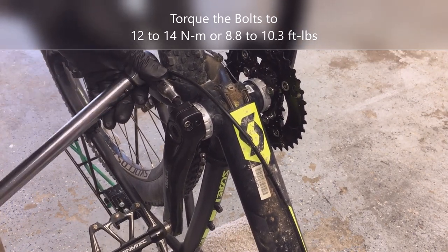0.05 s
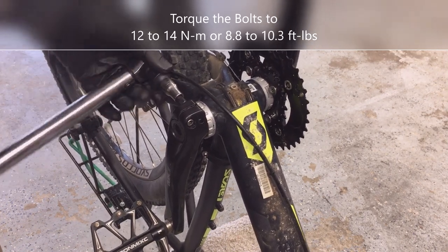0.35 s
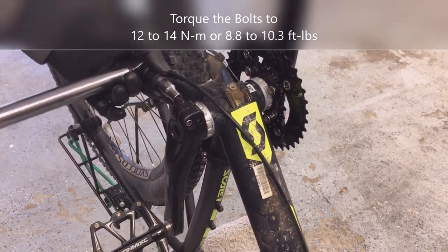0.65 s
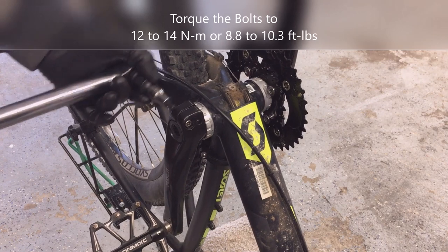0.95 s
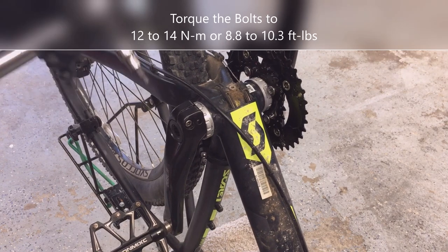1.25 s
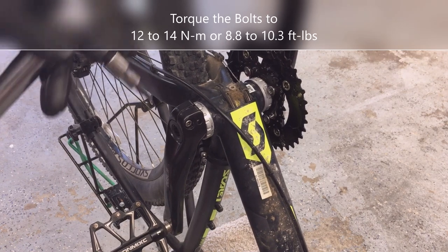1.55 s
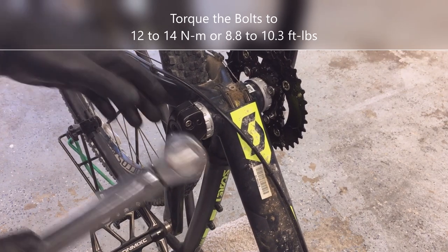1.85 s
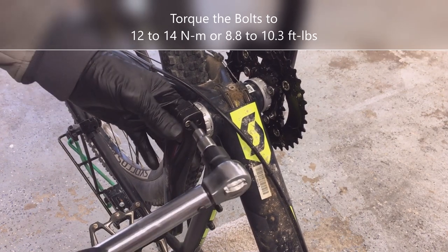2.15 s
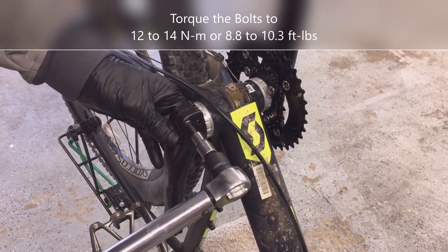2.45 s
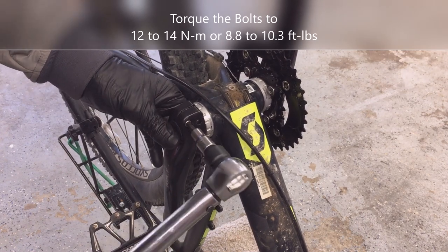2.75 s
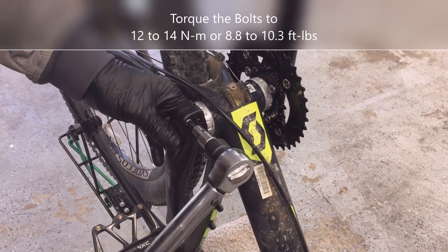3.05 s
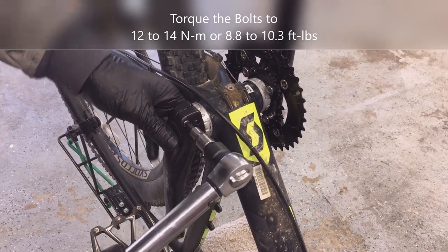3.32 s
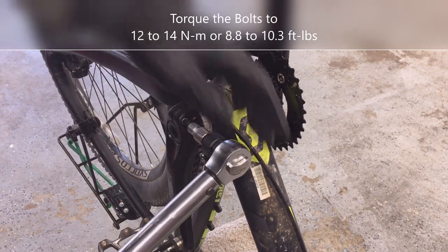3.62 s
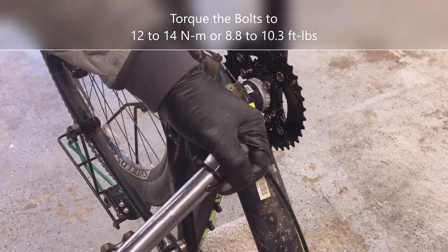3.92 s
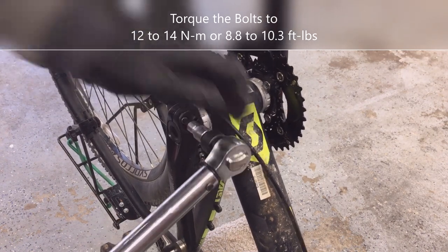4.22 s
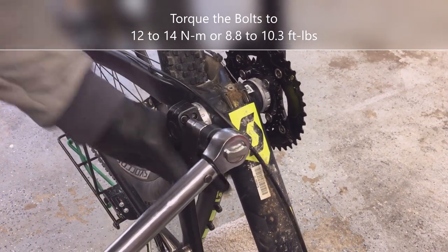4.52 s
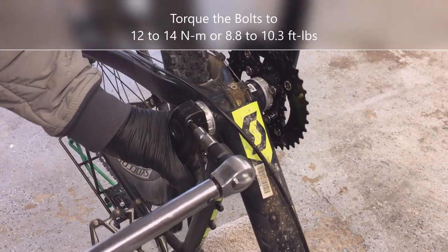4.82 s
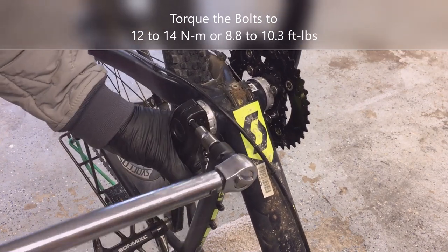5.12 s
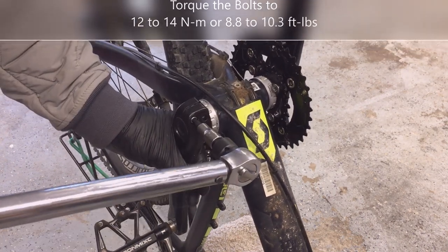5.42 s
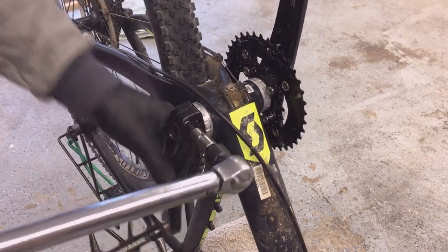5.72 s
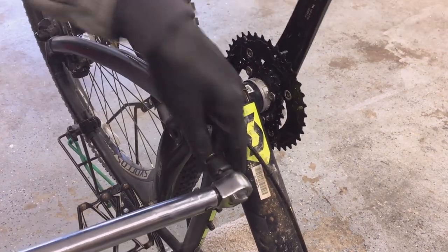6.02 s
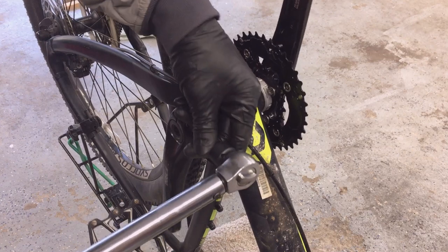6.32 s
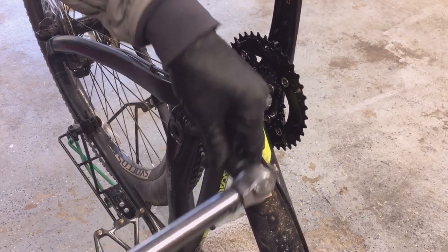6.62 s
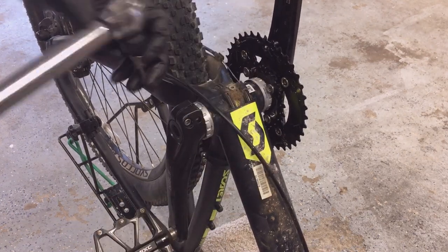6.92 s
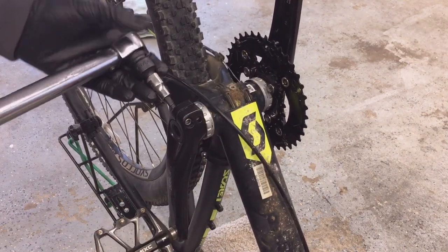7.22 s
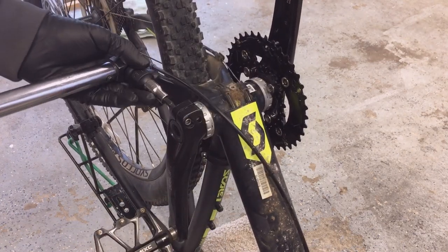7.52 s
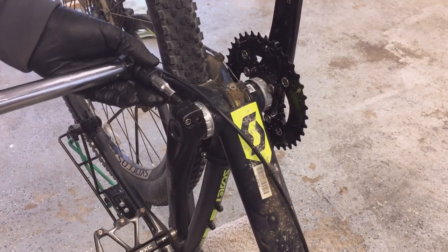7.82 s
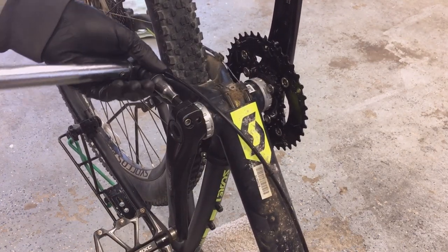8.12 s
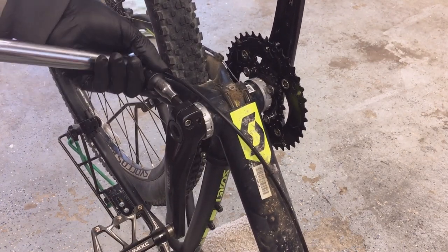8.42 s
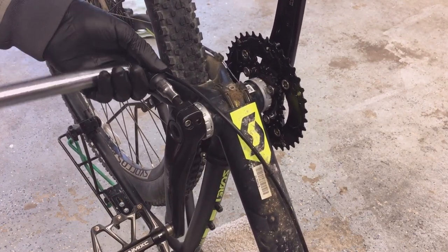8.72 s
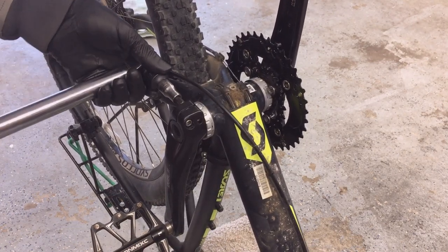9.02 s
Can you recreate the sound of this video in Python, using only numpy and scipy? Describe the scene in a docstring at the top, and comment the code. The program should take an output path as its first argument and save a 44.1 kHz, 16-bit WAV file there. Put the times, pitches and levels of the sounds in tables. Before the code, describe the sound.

In a small workshop with a faint low machine hum, a jacket sleeve swishes as a torque wrench clinks onto the bolts of a bicycle crank. The socket rings briefly, the frame knocks, the ratchet ticks and a rubber glove scuffs softly. Past halfway the wrench releases with a loud, ringing click and snaps back a quarter second later. More close steel taps follow.

```python
"""A low machine hum and the swish of a jacket sleeve, then a torque wrench clinks onto a bicycle crank.
The bit taps into the pinch bolts: steel chatters on steel, the socket rings and the frame knocks.
A rubber glove scuffs the wrench head and the ratchet ticks. Past halfway the wrench breaks over
with a loud, ringing click and snaps back a quarter second later. The small workshop adds a short tail."""
import sys
import numpy as np
from scipy import signal
from scipy.fft import rfft, irfft
from scipy.io import wavfile
from scipy.ndimage import uniform_filter1d

SR = 44100
rng = np.random.default_rng(int(sys.argv[2]) if len(sys.argv) > 2 else 0)


def dump_mix(stems):
    """Bounce the given channels to the path in sys.argv[1] as a 16-bit WAV at rate SR."""
    frames = np.atleast_2d(stems).T  # one column per channel
    limited = np.clip(frames, -1, 1)  # hard clip at full scale
    pcm = np.round(limited * 32767).astype(np.int16)
    wavfile.write(sys.argv[1], SR, pcm)


N = 403956

# room tone of still air: f/Hz, level/dB
AIR_EQ = [(20, -11.5), (30, -3.5), (42, 8), (60, 10.5), (100, 5.5), (160, -1.5), (260, -5), (370, -5.5),
          (550, -9), (800, -10.5), (1500, -8.5), (4200, -12), (5200, -25.5), (10000, -34), (16000, -36)]
# slow swells of the machine's deepest tone and of the one about a fifth above: t/s, level/dB
DRONE_SWELL = [(0, -49), (2.3, -56), (3.1, -53), (4.2, -47.5), (7.3, -44.5), (8.25, -47), (9.16, -54)]
FIFTH_SWELL = [(0, -57.5), (3, -59), (4.4, -66), (5.05, -63), (5.6, -56.5), (6.6, -57), (7, -66),
               (8.1, -51.5), (9.16, -53.5)]
# the machine's upper tones: f/Hz, level/dB, waver/dB
HUM_TONES = [(122, -69, 1.5), (134.5, -64.5, 2.5), (213, -74.5, 4), (249.3, -71, 3.5), (289, -78.5, 2),
             (332, -80, 3.5), (372, -74, 3), (502, -78.5, 3.5)]

# cues for sleeve swishes and glove scuffs: fastest moment t/s, level/dB, swell/s, fade/s
SLEEVE_STROKES = [(0.44, -47.5, 0.16, 0.24), (0.56, -54, .06, .16), (1.0, -57, 0.071, 0.28),
                  (1.32, -55, .05, .08), (1.55, -44.5, 0.135, 0.19), (1.93, -56.5, 0.21, 0.13),
                  (2.85, -56, 0.12, 0.18), (3.35, -61.5, .15, 0.24), (3.95, -57, 0.36, 0.39),
                  (4.22, -58, .05, .13), (4.56, -52, .08, 0.07), (4.97, -55.5, 0.13, .15),
                  (5.25, -56.5, 0.15, 0.12), (5.8, -53, 0.16, 0.084), (6.03, -50, 0.063, 0.059),
                  (6.3, -55, 0.052, 0.064), (6.55, -57, 0.071, 0.044), (7.08, -55.5, 0.28, 0.32),
                  (7.42, -58, .08, .12), (8.04, -50, 0.1, 0.33), (8.6, -51.5, 0.07, 0.2),
                  (8.76, -53, .08, .25), (9.14, -57, .05, .1)]
GLOVE_SCUFFS = [(0.72, -65, .03, .04), (1.13, -67, .02, .04), (1.315, -62, .02, .035),
                (1.41, -61, .03, .03), (3.44, -60, .015, 0.012), (3.535, -63, .015, .02),
                (3.74, -63, 0.028, 0.034), (3.85, -64, .03, .04), (3.99, -58, .04, 0.08),
                (4.19, -64, .03, 0.057), (4.535, -63, .025, .04), (7.605, -61, .012, .025)]
# tone of sliding cloth, crinkling folds and rubber on steel: f/Hz, level/dB
CLOTH_EQ = [(300, -26.5), (800, -13), (1400, -7.5), (2200, -4), (3200, -3), (4200, 0.5), (4550, -3),
            (4950, -13), (6300, -15.5), (7500, -21.5), (9400, -24), (11500, -32.5), (16000, -42.5)]
CREASE_EQ = [(800, -14), (1500, -3), (3000, -1), (4300, 0), (5000, -10), (7000, -18), (11000, -31),
             (16000, -44)]
RUBBER_EQ = [(2000, -18), (4300, 3), (5800, 1), (7200, -7), (9000, -15), (16000, -22)]

# the pawl slipping over single teeth: t/s, level/dB
PAWL_TICKS = [(0.947, -53), (1.005, -65), (1.405, -62), (1.794, -65), (7.0415, -58)]
# the hand nudging the loose wrench against the bolt, levels before trim: t/s, clink/dB, snap/dB
NUDGES = [(0.93, -44.5, -57), (1.183, -46.5, -57), (1.3548, -51, -66), (1.7605, -42, -55),
          (1.8414, -48, -60), (3.0975, -47, -60), (3.2012, -51.5, -67), (3.5125, -50, -58),
          (3.7914, -49, -68), (3.83, -51, -68), (3.946, -51, -62), (3.972, -49, -60), (4.215, -52, -68),
          (4.352, -51, -66), (4.64, -50, -60), (4.856, -52, -59), (6.903, -50, -66), (6.9473, -44.5, -62),
          (6.961, -47, -61), (7.0278, -50, -61), (7.3125, -48, -63), (7.351, -48.5, -63),
          (7.5902, -45, -53), (7.626, -52, -60), (8.945, -49, -66)]
# steel taps of bit, socket and ratchet, levels before trim: t/s, clink/dB, snap/dB, tick/dB,
# clack/dB, frame knock/dB, crank ring/dB, bit ring/dB, clink f/Hz, chatter/ms
TAPS = [(0.6156, -30.5, -36, -43, -39, -48, -60, -52, 3800, 3.2),
        (0.8759, -36, -40.5, -49, -40, -44, -60, -54, 3980, 6.9),
        (0.97, -31.5, -44.5, -48, -42, -44, -50, -52, 3920, 7.3),
        (1.7665, -41, -48.5, -53, -52, -58, -70, -62, 3900, 3),
        (2.4054, -18.5, -54, -66, -42, -37, -53, -58, 4050, 2.8),
        (2.5, -38, -63, -80, -52, -43, -58, -58, 4000, 11),
        (2.5176, -52, -51, -69, -48, -49, -65, -66, 3870, 3),
        (2.5282, -27, -51, -66, -41, -35, -48, -46, 3890, 5.4),
        (2.8678, -32, -33.5, -46, -37.5, -52.5, -66, -60, 3950, 4.8),
        (2.939, -25.5, -33.5, -47, -39.5, -52, -62, -60, 4380, 4.6),
        (2.997, -48, -64, -80, -54, -50, -54, -60, 3900, 8),
        (6.2643, -36.5, -55, -64, -51, -48.5, -61, -56, 3920, 4.3),
        (6.494, -31, -43, -50, -46.5, -57, -68, -58, 3940, 5.5),
        (6.503, -26.5, -42, -62, -44.5, -54, -66, -54, 4030, 5.3),
        (6.5285, -34, -48, -64, -50, -57, -68, -60, 3850, 1.8),
        (6.5346, -50, -43, -60, -50, -64, -74, -68, 3970, 1.5),
        (7.1848, -30.5, -39.5, -59, -39, -42, -55, -54, 4450, 8),
        (7.203, -18, -35, -39, -28.5, -30, -38, -37, 4050, 5.3),
        (7.826, -30.5, -43, -62, -40, -38, -48, -42, 4020, 6.9),
        (8.0169, -29, -39, -60, -32.5, -30, -36.5, -40, 3680, 6.3),
        (8.569, -22.5, -34, -56, -30, -31.5, -42, -37, 3950, 8)]
# layers of a tap (socket clink, bright snap, fine tick, mid clack, frame knock): f/Hz, level/dB
CLINK_EQ = [(2000, -37.5), (2800, -22.5), (3250, -5.5), (4000, 0), (4450, -1.5), (4850, -19.5), (7000, -40),
            (12000, -61)]
SNAP_EQ = [(3000, -19), (5000, 2), (6300, 0.5), (7700, -8), (9300, -3.5), (11000, -19.5), (16000, -38)]
TICK_EQ = [(5000, -23), (9000, -1), (11500, -1), (16000, -12)]
CLACK_EQ = [(600, -21.5), (1250, -4), (1750, -1), (2600, -0.5), (3400, -2), (5000, -33), (10000, -68)]
KNOCK_EQ = [(80, -23), (220, -6.5), (400, -1.5), (550, -2.5), (720, -0.5), (860, -2.5), (1150, 0),
            (2000, -23), (6000, -69)]
# ring of the socket at its usual pitch, the crank and the bit: f/Hz, relative level/dB, t60/s
SOCKET_MODES = [(3460, -4, 0.28), (3720, -6, 0.24), (3870, -2, 0.26), (4080, -1, .26), (4240, -3, 0.21),
                (4320, -11, 0.16)]
CRANK_MODES = [(234, -14, .19), (318, -14, .19), (385, -9, .2), (560, -10, .16), (684, 0, .19),
               (705, -6, .12), (770, -13, .12), (1141, -13, .18), (1249, -14, .22), (1725, -10, .2),
               (2135, -17, .19)]
BIT_MODES = [(3100, -8, .24), (3273, 0, .2), (3311, -2, .14), (3600, -8, .26), (3890, -7, .2),
             (6400, -15, .14), (8770, -24, .14)]

# the two clicks of the release mechanism:
# t/s, level/dB, steel ring/dB, frame shudder/dB, rebound delay/ms, rebound relative to the hit/dB
BREAK_OVER = (5.3647, -8, -26, -52.5, 4.3, -3)
SNAP_BACK = (5.6116, -17, -35.5, -42.5, 4.0, -2.5)
# tone of those two hits: f/Hz, level/dB
BREAK_EQ = [(150, -41.5), (400, -26.5), (700, -32), (950, -20.5), (1500, -29), (1850, -11.5), (2050, -13),
            (2380, 1.5), (2800, -5), (3200, -4.5), (3500, -9), (4200, 3), (4600, -2.5), (5000, -14),
            (6500, -17), (7600, -23), (8400, -30), (12000, -38), (16000, -58)]
BACK_EQ = [(100, -15), (400, -14), (600, -21), (1150, -14.5), (1400, -7), (1900, -8), (2400, -11.5),
           (3100, 2.5), (3700, -3.5), (4300, 0), (5200, -12), (6400, -10.5), (7800, -25), (9400, -17.5),
           (10500, -39), (16000, -48)]
# ring of the wrench tube, the wrench head and the bicycle frame: f/Hz, relative level/dB, t60/s
TUBE_MODES = [(1900, -14, .2), (2252, -11, .16), (2449, -3, .21), (2654, -12, .14), (3155, -18, .24),
              (3526, -12, .2), (3646, -9, .2), (3747, -6, .18), (3960, -7, .11), (4105, -5, .15),
              (4134, 0, .19), (4312, -6, .2), (4400, -6, .1), (4502, -4, .16), (4813, -14, .18),
              (6218, -20, .18), (6713, -19, .12), (7316, -23, .13), (10560, -12, .12)]
HEAD_MODES = [(1238, -1, .16), (1380, -5, .14), (1615, -5, .2), (1707, -4, .2), (3060, -2, .12),
              (3278, -1, .2), (3569, -7, .2), (4167, 0, .12), (4382, -2, .1), (5233, -8, .09),
              (6169, -5, .12), (6476, -12, .18)]
FRAME_MODES = [(130, -1, .3), (175, -4.5, .22), (232, -3.5, .2), (298, -1, .2), (345, -2, 0.2),
               (680, -8, .2)]


def undb(db):
    """Decibels to gain."""
    return np.exp(np.asarray(db) * np.log(10) / 20)


def curve(rows):
    """Rows of (t/s, value) joined by straight lines."""
    return np.interp(np.arange(N) / SR, *np.transpose(rows))


def unit(x):
    """Scale to rms 1."""
    return x / np.sqrt(np.mean(x ** 2))


def hit_level(x, db):
    """Scale a hit so that its energy equals db held for 4 ms."""
    return x * undb(db) * np.sqrt(.004 * SR / np.sum(x ** 2))


def add(out, s, x):
    """Mix x into out from time s."""
    i = int(s * SR)
    out[i:i + len(x)] += x[:len(out) - i]


def eq(x, points, size=2048):
    """Minimum-phase EQ through (f/Hz, level/dB) points, so nothing rings ahead of an attack."""
    hz, db = np.transpose(points)
    bins = np.maximum(np.fft.rfftfreq(size, 1 / SR), 1)
    gain = undb(np.interp(np.log(bins), np.log(hz), db))
    cepstrum = irfft(np.log(gain))
    cepstrum[1:size // 2] *= 2
    cepstrum[size // 2 + 1:] = 0
    impulse = irfft(np.exp(rfft(cepstrum)))
    return signal.fftconvolve(x, impulse)[:len(x)]


def wander(rate_hz):
    """Smooth random modulation with rms 1."""
    hold = int(SR / rate_hz)
    steps = np.repeat(rng.standard_normal(N // hold + 1), hold)
    return unit(uniform_filter1d(uniform_filter1d(steps, hold), hold))[:N]


def swells(strokes, swell_shape=3.6, fade_shape=1.5):
    """Rubbing envelope: each stroke swells to its fastest moment and fades; overlaps add in power."""
    t = np.arange(N) / SR
    power = np.zeros(N)
    for s, db, swell_s, fade_s in strokes:
        rise = ((s - t[t < s]) / swell_s) ** swell_shape  # shape 1 is exponential, 2 a bell
        fall = ((t[t >= s] - s) / fade_s) ** fade_shape
        distance = np.concatenate([rise, fall])
        power += (undb(db) * np.exp(-np.minimum(distance, 20))) ** 2
    return np.sqrt(power)


def chatter(ms, attack, fade, size=3072):
    """Contact force: one spike of height attack, then dense micro-bounces that die out after ms."""
    age = np.arange(size) / SR * 1000 / ms
    force = rng.standard_normal(size) * np.exp(-fade * age) / (1 + age ** 8)
    force /= np.sqrt(np.sum(force ** 2))
    force[0] += attack
    return force


def strike(body_eq, db, ms, attack, fade):
    """A chattering contact coloured by the body it hits."""
    return hit_level(eq(chatter(ms, attack, fade), body_eq), db)


def ring(modes, db, scatter_db=3.0, detune=.0018, size=8820):
    """Decaying modes whose mix and pitch vary from hit to hit; db sets their starting rms."""
    t = np.arange(size) / SR
    hz, mode_db, t60 = np.transpose(modes)[:, :, None]
    gain = undb(mode_db + scatter_db * rng.standard_normal(hz.shape))
    hz = hz * (1 + detune * rng.standard_normal(hz.shape))
    decay = np.exp(-np.log(1000) * t / t60)
    partials = gain * np.sin(2 * np.pi * (hz * t + rng.random(hz.shape))) * decay
    onset = 1 - np.exp(-t / .001)
    return undb(db) * partials.sum(0) * onset / np.sqrt(np.sum(gain ** 2) / 2)


def workshop(x, early_db=-12, early_t60=.12, late_db=-21, late_t60=.35, damp_hz=5500):
    """Floor and bicycle throw back early reflections; the walls add a short, duller tail."""
    size, predelay_s = 22050, .0037
    t = np.arange(size) / SR
    early, late = rng.standard_normal((2, size)) * np.clip(t / predelay_s - 1, 0, 1)
    early *= np.exp(-np.log(1000) * t / early_t60)
    late = signal.lfilter(*signal.butter(1, damp_hz, fs=SR), late)
    late *= np.exp(-np.log(1000) * t / late_t60)
    reverb = (undb(early_db) * unit(early) + undb(late_db) * unit(late)) / np.sqrt(size)
    return x + signal.fftconvolve(x, reverb)[:N]


def room_tone(db=-56):
    """Still air: a soft, bass-heavy bed of noise."""
    return unit(eq(rng.standard_normal(N), AIR_EQ, size=8192)) * undb(db)


def machine_hum(drone_hz=53.6, fifth_hz=79.6, deep_waver_db=.8, drift=.003996):
    """Machine tones that waver separately in level and drift together in pitch."""
    out = np.zeros(N)
    clock = np.cumsum(1 + drift * wander(2)) / SR
    deep = [(drone_hz, curve(DRONE_SWELL), deep_waver_db), (fifth_hz, curve(FIFTH_SWELL), deep_waver_db)]
    for hz, db, waver_db in deep + list(HUM_TONES):
        tone = np.sqrt(2) * np.sin(2 * np.pi * (hz * clock + rng.random()))
        out += tone * undb(db + waver_db * wander(4))
    return out


def sleeve(trim_db=.8, flutter_db=.9, grain_db=1.8, shift_db=1.6, creases_per_s=90, crease_db=-13):
    """Cloth slides on cloth: a fluttering, grainy hiss whose tone shifts as folds move and crinkle."""
    grains = rng.standard_normal(N) * undb(grain_db * wander(600))
    hiss = unit(eq(grains, CLOTH_EQ))
    body = signal.sosfiltfilt(signal.butter(2, 3000, fs=SR, output="sos"), hiss)
    top = hiss - body
    slide = body * undb(shift_db * wander(18)) + top * undb(shift_db * wander(18))
    folds = (rng.random(N) < creases_per_s / SR) * rng.uniform(-1, 1, N)
    crinkle = signal.fftconvolve(folds, chatter(2.5, attack=.5, fade=.9))[:N]
    cloth = unit(slide + undb(crease_db) * unit(eq(crinkle, CREASE_EQ)))
    motion = np.hypot(swells(SLEEVE_STROKES), undb(-69.5))  # the sleeve never lies quite still
    return cloth * motion * undb(trim_db + flutter_db * wander(25))


def glove(grain_db=3.6):
    """Rubber sticks and slips on the wrench head: a thin, grainy scuff."""
    slip = rng.standard_normal(N) * undb(grain_db * wander(400))
    return unit(eq(slip, RUBBER_EQ)) * swells(GLOVE_SCUFFS)


def pawl():
    """The ratchet's pawl slips over single teeth: tiny, very bright ticks."""
    out = np.zeros(N)
    for s, db in PAWL_TICKS:
        add(out, s, strike(TICK_EQ, db, ms=2.5, attack=.6, fade=1.1))
    return out


def nudges(tick_db=-31, clack_db=-2.5, knock_db=-10.5, ring_db=-22, hz=4000, ms=5.6):
    """The loose wrench bumps the bolt: soft rows like TAPS, the added layers set against the clink."""
    return [(s, db, snap, db + tick_db, db + clack_db, db + knock_db, db + ring_db, db + ring_db, hz, ms)
            for s, db, snap in NUDGES]


def taps(usual_hz=4000, graze_s=.003):
    """Each contact clinks the socket and, as far as it is pressed home, knocks the crank and frame."""
    out = np.zeros(N)
    for s, clink, snap, tick, clack, knock, crank, bit, hz, ms in list(TAPS) + nudges():
        # the socket's pitch shifts with how it is gripped and seated
        socket_eq = np.array(CLINK_EQ) * [hz / usual_hz, 1]
        socket_modes = np.array(SOCKET_MODES) * [hz / usual_hz, 1, 1]
        # the bit grazes the edge just before it lands; each layer gets its own trim in dB
        add(out, s - graze_s, strike(socket_eq, clink - 19, ms, attack=0, fade=0))
        add(out, s, strike(socket_eq, clink + .33, ms, attack=.22, fade=.3))
        add(out, s, ring(socket_modes, clink - 21.5, detune=.0122))
        # the higher the band, the tighter its transient
        add(out, s, strike(SNAP_EQ, snap + 1.4, ms, attack=.6, fade=1.0))
        add(out, s, strike(TICK_EQ, tick + 1.5, ms, attack=.63, fade=2.2))
        add(out, s, strike(CLACK_EQ, clack + .3, 1.66 * ms, attack=.25, fade=.63))
        # the heavy frame answers more slowly than the steel, and shakes the loose socket
        add(out, s, strike(KNOCK_EQ, knock - .6, ms=20, attack=.1, fade=.98))
        shake = chatter(ms=30, attack=0, fade=.85) ** 3
        rattle = eq(shake, socket_eq) + .45 * eq(shake, CLACK_EQ)
        add(out, s, hit_level(rattle, knock - 2.5))
        # where the bit lands decides whether the crank or the bit itself rings on
        add(out, s, ring(CRANK_MODES, crank - .8, scatter_db=2.0, detune=.003))
        add(out, s, ring(BIT_MODES, bit - 2.2, detune=.003))
    return out


def release_click(cue, body_eq, modes, hit_ms=3.8, creep_s=.003, creep_db=-28, flutter_db=3.2):
    """The toggle slips, slams into the tube wall, rebounds once and leaves steel and frame ringing."""
    s, db, ring_db, frame_db, delay_ms, rebound_db = cue
    out = np.zeros(N)
    add(out, s - creep_s, strike(body_eq, db + creep_db, hit_ms, attack=0, fade=0))
    add(out, s, strike(body_eq, db, hit_ms, attack=.4, fade=.18))
    # the rebound is softer, so it is duller too
    rebound = strike(body_eq, db + rebound_db, ms=2.8, attack=.34, fade=.3)
    add(out, s + delay_ms / 1000, signal.lfilter(*signal.butter(2, 6000, fs=SR), rebound))
    # loose parts inside the wrench make its ring flutter
    steel = ring(modes, ring_db, scatter_db=1.2, detune=.001)
    add(out, s, steel * undb(flutter_db * wander(170)[:len(steel)]))
    add(out, s, ring(FRAME_MODES, frame_db, scatter_db=1.0))
    return out


def scene():
    """Mono mix: the wrench in the workshop reverb, over dry sleeve, glove, room tone and hum."""
    clicks = release_click(BREAK_OVER, BREAK_EQ, TUBE_MODES)
    clicks += release_click(SNAP_BACK, BACK_EQ, HEAD_MODES)
    wrench = workshop(clicks, early_db=-14, late_db=-22.5, late_t60=.32, damp_hz=3500)
    wrench += workshop(taps() + pawl())
    return (wrench + sleeve() + glove() + room_tone() + machine_hum())[None]


def record(dry, ceiling=.85, top_hz=15900):
    """Hard-clip the peaks just under full scale, then cut the top with a steep low-pass."""
    clipped = np.clip(dry, -ceiling, ceiling)
    return signal.sosfilt(signal.ellip(8, .2, 70, top_hz, fs=SR, output="sos"), clipped)


dry = scene()
out = record(dry)
dump_mix(out)
```